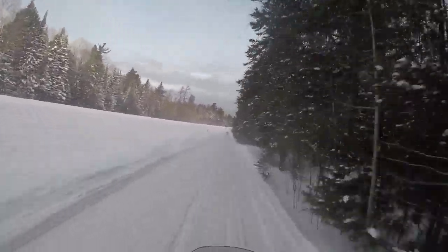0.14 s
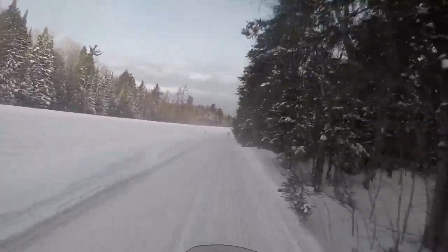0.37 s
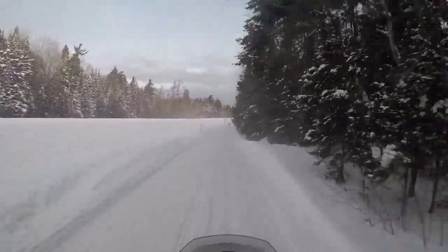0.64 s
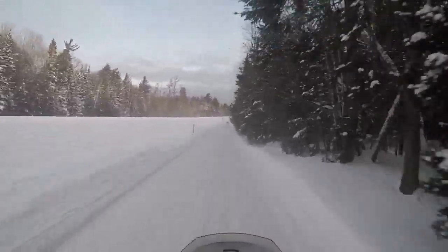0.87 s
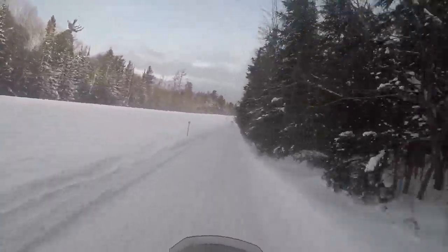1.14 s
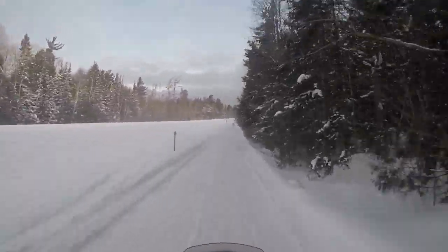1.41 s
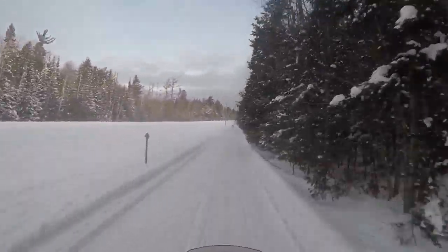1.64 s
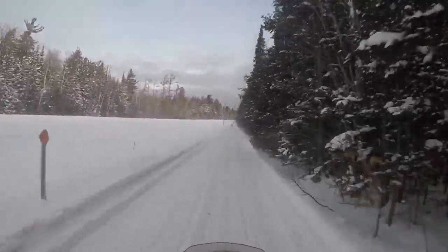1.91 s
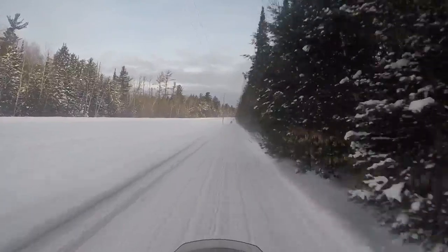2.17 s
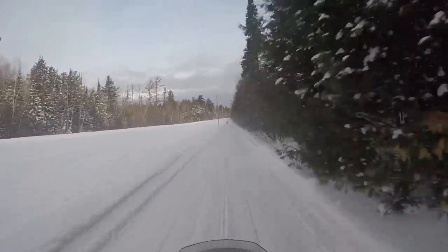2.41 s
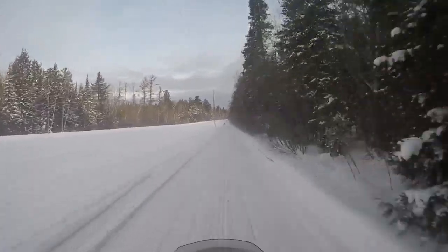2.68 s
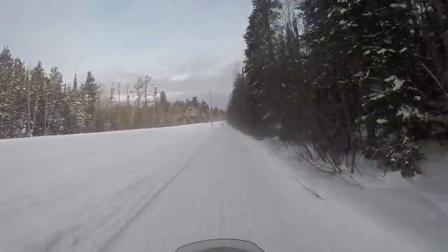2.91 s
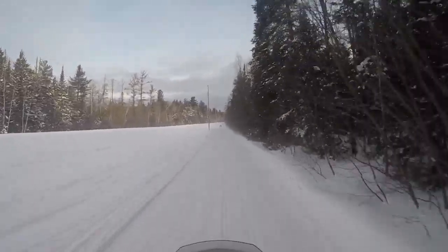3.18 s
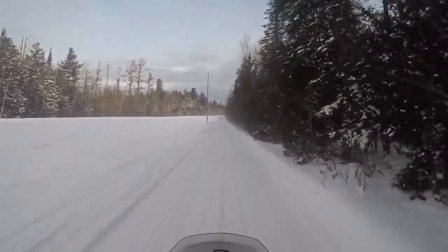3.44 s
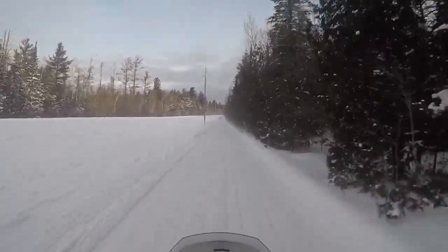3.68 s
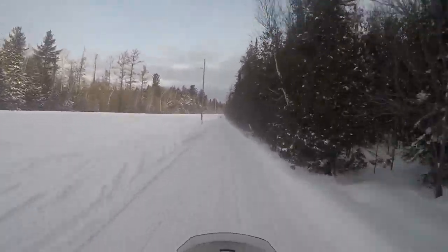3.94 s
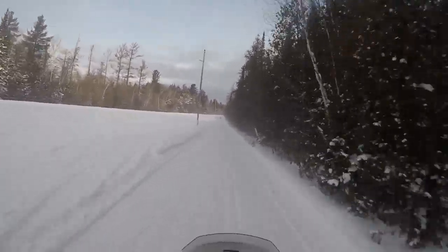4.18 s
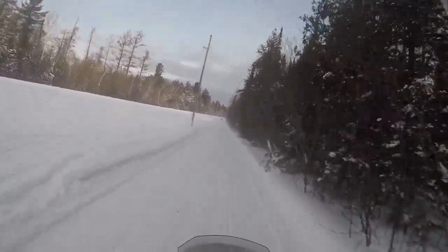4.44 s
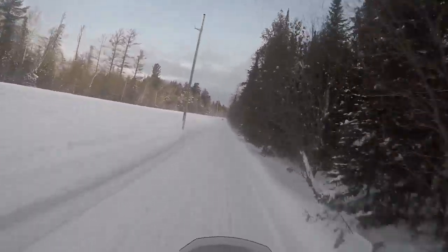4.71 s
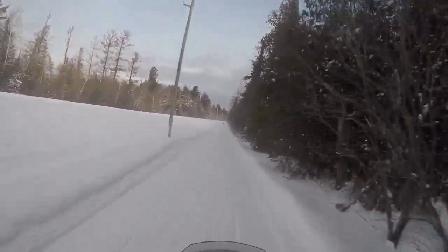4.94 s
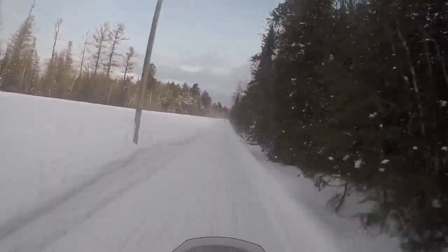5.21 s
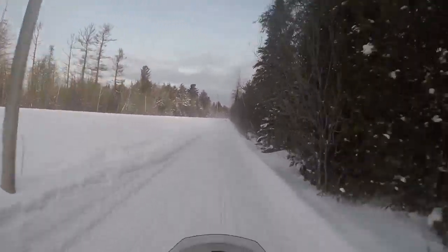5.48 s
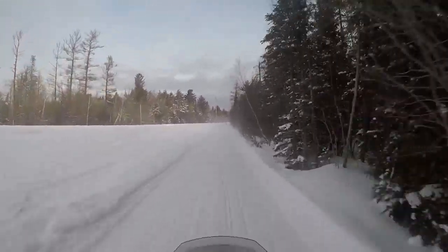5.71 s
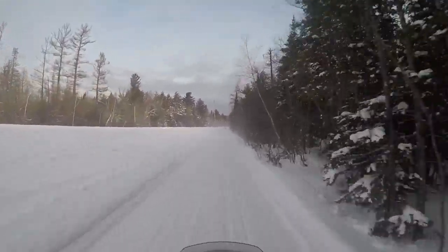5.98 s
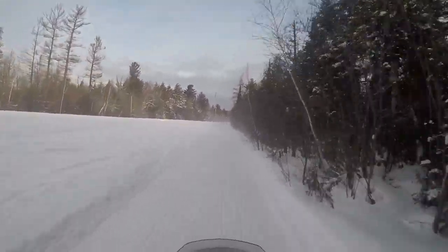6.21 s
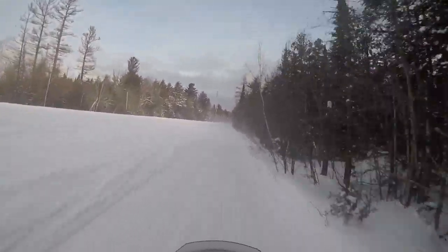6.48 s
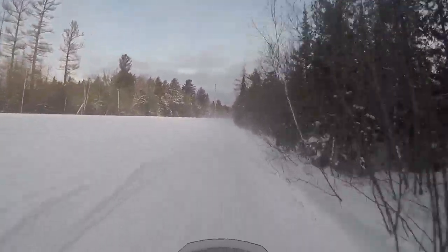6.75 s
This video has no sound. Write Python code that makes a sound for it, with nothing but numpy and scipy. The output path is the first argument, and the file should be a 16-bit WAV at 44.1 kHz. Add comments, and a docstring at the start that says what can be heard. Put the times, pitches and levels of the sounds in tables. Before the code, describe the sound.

A snowmobile cruises along a packed snowy trail beside woods, heard from the rider's helmet. The two-stroke engine buzzes in a dense, raspy drone with a faint track whine, rising very slightly in the first two seconds. Wind buffets the microphone with stumbling low booms; snow hisses below. One tiny high squeak comes near two seconds, on the right.

```python
"""A two-stroke snow machine cruises on a packed trail, heard by a two-port microphone on the rider's helmet.
Sines on multiples of the crank and track-lug rates sing through the exhaust, a noise swelling at each firing.
Close around the ports, wind buffets the helmet as low patchy noise and makes it boom, a stumbling low tone.
Below the rider, snow hisses under skis and track as high patchy noise; a rubber joint, nearer the right port,
squeaks once in four short gliding slips."""
import sys
import numpy as np
from scipy import signal
from scipy.fft import rfft, irfft, next_fast_len
from scipy.io import wavfile
from scipy.ndimage import uniform_filter1d

SR = 44100
rng = np.random.default_rng(int(sys.argv[2]) if len(sys.argv) > 2 else 0)


def decibels_to_gain(level_db):
    """Convert a level in decibels to a linear amplitude gain (20 dB per decade)."""
    exponent = np.asarray(level_db, float) / 20
    return 10 ** exponent


def transcribe(u):
    """Save the signal u as a 16-bit wav file named by the first command-line argument.

    u: samples, shape (n,) or (channels, n), limited to [-1, 1]; the rate is SR.
    q: integer samples, one column per channel.
    """
    v = np.clip(np.atleast_2d(u).T, -1, 1)
    q = np.round(v * 32767).astype(np.int16)
    wavfile.write(sys.argv[1], SR, q)


N = 302526  # samples

# pace on the trail: t/s, crank turns f/Hz, track lugs passing the drive wheel f/Hz
SHAFT_RATES = [(0.0, 86.3, 228.6), (0.45, 86.6, 227.6), (0.7, 87.7, 227.6), (1.2, 88.6, 228.4),
               (1.7, 91.7, 233.7), (2.2, 91.2, 238.0), (2.5, 91.7, 240.9), (3.45, 90.9, 241.5),
               (4.5, 90.4, 242.9), (5.2, 91.0, 244.2), (5.45, 91.9, 244.7), (5.7, 93.4, 246.3),
               (6.2, 93.0, 247.0), (6.86, 91.0, 247.0)]
# crank multiples from the second up: level/dB over the noise per Hz at the same pitch
CRANK_LEVELS = [16, 13, 12, 0, 12, 12, 12, 6, 7, 2, 12, 5, 12, 12, 10, 15, 15, 12, 15, 13, 13, 13, 12, 8, 9,
                9, 11, 10, 4]
# lug-rate multiples from the first up: level/dB over the noise per Hz at the same pitch
LUG_LEVELS = [16, 13, 17]
# exhaust noise at the ports, before hood, patches and level wander: # f/Hz, left level/dB per Hz, right
# level/dB per Hz, likeness/0-1, left lead/rad
ROAR_PORTS = [(441, -59, -54.8, .8, -.9), (489, -57.9, -51.6, .58, -1), (581, -61.7, -60.3, .63, -1.5),
              (640, -57.1, -56.7, .77, -2.4), (759, -65.9, -61.2, .46, -2.2),
              (855, -58.1, -51.8, .91, -2.8), (1000, -62, -59, .8, -3.5), (1222, -64.2, -63.4, .46, -3.5),
              (1370, -60.1, -55.6, .05, -4), (1480, -56, -54, .85, -6.3), (1792, -57, -55.5, .8, -5.5),
              (1932, -52, -54.5, .87, -5.2), (2137, -54, -55, .24, -5.4), (2503, -58.2, -57, .76, -6.6),
              (2740, -61, -59.5, .07, -7.3), (2987, -60.5, -59.2, .54, -10.4),
              (3273, -63.5, -62, .53, -10.9), (3560, -70, -64.5, .29, -11.1)]
# narrow resonances of hood and exhaust can: f/Hz, width/Hz, level/dB
HOOD_RESONANCES = [(870, 50, 2), (915, 50, 4), (1548, 45, 4.5), (1670, 90, 5.5), (1910, 60, 3),
                   (2095, 50, 3)]
# wind noise at the ports, columns as for the exhaust
BUFFET_PORTS = [(8, -55, -54.2, .99, 0), (27, -39, -38, .995, 0), (38, -39, -38.1, .995, 0),
                (50, -42, -41, .995, 0), (70, -37, -36, .995, -.1), (100, -36, -35, .995, -.1),
                (145, -49, -48.2, .98, -.1), (180, -48, -47, .98, -.2), (210, -52, -50.2, .8, -.1),
                (260, -47, -45.5, .98, -.2), (290, -49.8, -49.2, .97, -.4), (360, -43.5, -41, .99, -.6),
                (409, -55.3, -54, .93, -.7), (441, -59, -54.8, .8, -.9)]
# the helmet's boom, before each port's own gain: t/s, level/dB, f/Hz
HELMET_BOOM = [(0.0, -13.5, 97.7), (0.94, -10.5, 94.8), (1.14, -17, 102.8), (1.2, -15.5, 94.4),
               (2.62, -13.5, 94.2), (2.77, -20, 101.1), (3.84, -11.5, 95.4), (4.68, -16.5, 101),
               (4.87, -16.5, 108.5), (4.93, -10, 95.5), (5.16, -17.5, 99.6), (5.31, -19.5, 87.9),
               (5.52, -7.5, 95.8), (5.73, -14.5, 96), (5.96, -23, 82.2), (6.06, -10, 98.9),
               (6.34, -13.5, 103.9), (6.86, -18, 89.0)]
# snow noise at the ports, columns as for the exhaust
HISS_PORTS = [(3560, -71, -65.5, .29, 1.5), (3700, -70.5, -65, .5, 2), (3880, -66, -60, .75, 2.3),
              (4188, -67.9, -58.6, .42, 2.8), (4731, -59.4, -63, .7, 3.9), (5302, -66.3, -60.6, .49, 2.7),
              (5835, -62.8, -58.5, .87, 3.2), (6250, -68.5, -66.5, .6, 3.2), (6700, -68.5, -68.5, .5, 3.2),
              (7400, -71.9, -74.9, .05, 3.4), (7800, -73, -71, .4, 6.9), (9400, -80, -78.5, .75, 6.4),
              (9850, -85, -84, .75, 6.3), (10150, -95, -95, .8, 6.3), (10700, -94, -94, .6, 6.3),
              (11200, -100, -100, .5, 6.3), (13500, -107, -107, .6, 6.2)]
# slow swells over the usual level: t/s, buffet level/dB, roar level/dB, hiss level/dB
LAYER_LEVELS = [(0.0, 0.47, 0.33, 1.5), (0.55, -1, .1, 2), (1.15, -.6, -1.4, -0.42),
                (1.7, -0.26, -0.23, -1.2), (2.3, 1.1, 0.26, 1.3), (2.8, .1, .6, 2.7), (3.3, 2.5, 0.71, 2.4),
                (3.9, -.7, -.4, 1.4), (4.5, 0.2, -1.5, -0.46), (5.15, -0.27, -0.0074, 2.4),
                (5.7, .3, 0.59, 1.4), (6.3, 0.6, 0.93, 2), (6.86, -2.2, -2.3, -0.84)]
# slips of the rubber joint: start t/s, length t/s, level/dB at the right port, first f/Hz, last f/Hz
JOINT_SLIPS = [(1.8795, .0155, -16, 4130, 4340), (1.895, .009, -19, 4270, 4280),
               (1.904, .0135, -19, 4120, 4150), (1.9175, .006, -18, 4260, 4420)]


def evened(x):
    """Scales to rms 1."""
    return x / np.sqrt(np.mean(x ** 2) + 1e-20)


def curve(rows, column, t):
    """Reads one column of a time table."""
    rows = np.asarray(rows)
    return np.interp(t, rows[:, 0], rows[:, column])


def drift(top_hz, count=1):
    """Slow chance of rms 1, holding rates up to about top_hz."""
    points = N // 64 + 2  # one every 64 samples
    hz = np.fft.rfftfreq(points, 64 / SR)
    spectra = rfft(rng.standard_normal((count, points))) / (1 + (hz / top_hz) ** 2)
    slow = irfft(spectra, points)
    return [np.interp(np.arange(N) / 64, np.arange(points), evened(row)) for row in slow]


def at_ports(ports, hz):
    """Left dB, right dB, likeness and left lead at the pitches hz, the hood's resonances on top."""
    ports = np.array(ports)
    log_hz, log_rows = np.log(hz + 1), np.log(ports[:, 0] + 1)
    left_db, right_db, alike, phase = (np.interp(log_hz, log_rows, v) for v in ports.T[1:])
    hood_db = sum(db / (1 + (2 * (hz - f) / width) ** 2) for f, width, db in HOOD_RESONANCES)
    return left_db + hood_db, right_db + hood_db, np.clip(alike, 0, 1), phase


def orders(levels_db, first, column, waver_db, waver_hz, jitter):
    """Sines on multiples of a shaft rate, coloured by the resonances they glide through; each wavers in level."""
    rate = curve(SHAFT_RATES, column, np.arange(N) / SR)
    turns = np.cumsum(rate * (1 + jitter * drift(6.2)[0])) / SR  # jitter: rms share of the rate
    out, coarse = np.zeros((2, N)), np.arange(0, N, 256)
    wavers = drift(waver_hz, count=len(levels_db))
    for multiple, (db, waver) in enumerate(zip(levels_db, wavers), first):
        left_db, right_db, _, phase = at_ports(BUFFET_PORTS + ROAR_PORTS, multiple * rate[coarse])
        ports_db = np.array([left_db, right_db])
        sizes = decibels_to_gain(db + waver_db * waver[coarse] + ports_db) * np.sqrt(2)  # rms to peak
        left, right, phase = (np.interp(np.arange(N), coarse, v) for v in (*sizes, phase))
        angle = 2 * np.pi * (multiple * turns + rng.random())
        out += [left * np.sin(angle + phase), right * np.sin(angle)]
    return out


def port_noise(ports, column, size, patchy_db, patch_hz, patch_s, wander_db):
    """Random short-time spectra at both ports, with drifting patches and a slow wander in level, on the layer's
    level curve."""
    hop = size // 4
    hz, frames = np.fft.rfftfreq(size, 1 / SR), N // hop + 5
    a, b, c, d, patches = rng.standard_normal((frames, len(hz), 5)).T
    bins, spans = int(patch_hz * size / SR) + 1, int(patch_s * SR / hop) + 1
    patches = evened(uniform_filter1d(uniform_filter1d(patches, bins, 0), spans, 1))
    left_db, right_db, alike, phase = at_ports(ports, hz[:, None])
    right = a + 1j * b
    # the left port shares part of the right port's noise, and has the rest to itself
    left = np.exp(1j * phase) * (alike * right + np.sqrt(1 - alike ** 2) * (c + 1j * d))
    level_db = curve(LAYER_LEVELS, column, np.arange(frames) * hop / SR)
    inside = ((hz >= ports[0][0]) & (hz < ports[-1][0]))[:, None]
    shape = inside * decibels_to_gain(level_db + patchy_db * patches)
    spectra = shape * np.array([left * decibels_to_gain(left_db), right * decibels_to_gain(right_db)])
    noise = signal.istft(spectra, SR, nperseg=size, noverlap=size - hop, scaling="psd")[1][:, :N]
    return decibels_to_gain(wander_db * drift(3)[0]) * noise


def engine():
    """Crank orders: the two-stroke repeats every turn, so its tones lie on multiples of the crank rate."""
    return orders(CRANK_LEVELS, first=2, column=1, waver_db=2.2, waver_hz=1.2, jitter=.0005)


def exhaust_roar():
    """Broad noise that swells a little with each firing, two to a crank turn, and a little once a turn."""
    turns = np.cumsum(curve(SHAFT_RATES, 1, np.arange(N) / SR)) / SR
    gate = 1 + .12 * np.cos(4 * np.pi * turns) + .08 * np.cos(2 * np.pi * turns)
    noise = port_noise(ROAR_PORTS, column=2, size=2048, patchy_db=0.59, patch_hz=307.5,
                       patch_s=0.1, wander_db=0.34)
    return gate * noise


def track():
    """Lugs passing the drive wheel sing on multiples of their own rate."""
    return orders(LUG_LEVELS, first=1, column=2, waver_db=2.2, waver_hz=1.5, jitter=.0015)


def wind_buffet():
    """Wind on the helmet, close to the ports: low noise, nearly alike at both in the deep bass."""
    return port_noise(BUFFET_PORTS, column=1, size=4096, patchy_db=1.1, patch_hz=60, patch_s=.1, wander_db=.7)


def boom():
    """Eddies shake the helmet near one low resonance: a tone whose phase and size stumble."""
    stumble_rad, eddy_share, eddies_hz = 0.49, 0.45, 8.7  # eddy_share: part of the power
    t = np.arange(N) / SR
    stumble, push, shove = drift(eddies_hz, count=3)
    angle = 2 * np.pi * np.cumsum(curve(HELMET_BOOM, 2, t)) / SR + stumble_rad * stumble
    swing = np.sqrt(2 * (1 - eddy_share)) + np.sqrt(eddy_share) * (push + 1j * shove)
    tone = decibels_to_gain(curve(HELMET_BOOM, 1, t)) * (swing * np.exp(1j * angle)).imag
    return decibels_to_gain([[-1.1], [-.1]]) * tone  # left, right


def snow_hiss():
    """Snow under skis and track: high noise in short-lived patches."""
    return port_noise(HISS_PORTS, column=3, size=512, patchy_db=1.07, patch_hz=3000,
                      patch_s=0.049, wander_db=0.62)


def squeak():
    """A brief stick-slip whistle nearer the right port; each slip swells, glides up and stops."""
    edge = .22  # share of a slip spent rising, and again falling
    out = np.zeros((2, N))
    left_lead = at_ports(HISS_PORTS, 4200)[3]
    for start, length, db, first_hz, last_hz in JOINT_SLIPS:
        u = np.arange(0, length, 1 / SR) / length  # 0 to 1 through the slip
        angle = 2 * np.pi * np.cumsum(first_hz + (last_hz - first_hz) * u) / SR
        size = np.sqrt(2) * decibels_to_gain(db) * np.minimum(1, np.minimum(u, 1 - u) / edge)
        both = size * np.array([decibels_to_gain(-10) * np.sin(angle + left_lead), np.sin(angle)])
        out[:, round(start * SR):][:, :len(u)] += both
    return out


def scene():
    """Machine, wind and snow together, as they reach the helmet."""
    machine = engine() + exhaust_roar() + track()
    wind = wind_buffet() + boom()
    return machine + wind + snow_hiss() + squeak()


def top_cut(x):
    """Nothing passes above the cut-off."""
    return signal.sosfilt(signal.butter(12, 13500, fs=SR, output="sos"), x)


def record(dry):
    """A fast limiter on the bass flattens the tops of the booms; the highest peaks are rounded off."""
    spectrum, hz = rfft(dry), np.fft.rfftfreq(N, 1 / SR)
    bass = irfft(spectrum / (1 + (hz / 150) ** 6), N)
    envelope = abs(signal.hilbert(bass.mean(0), next_fast_len(N))[:N])
    swing = uniform_filter1d(envelope, 90)  # about 2 ms
    held = dry - bass + bass / (1 + (swing / .5) ** 4) ** 0.2
    rounded = 1.582 * np.tanh(held / 1.651)
    return top_cut(rounded)


dry = scene()
out = record(dry)
transcribe(out)
```